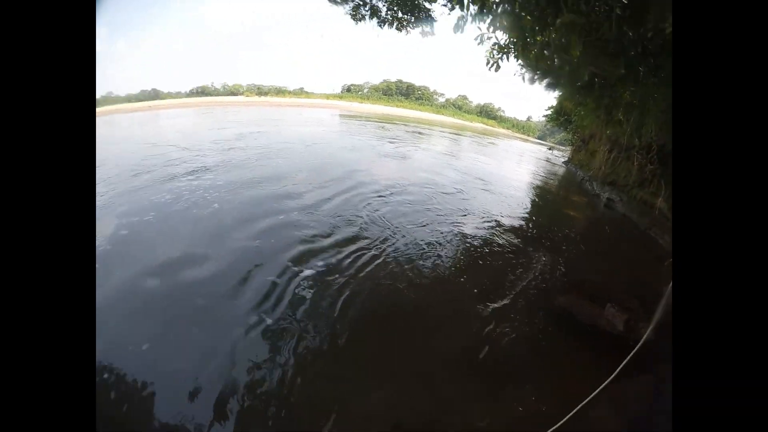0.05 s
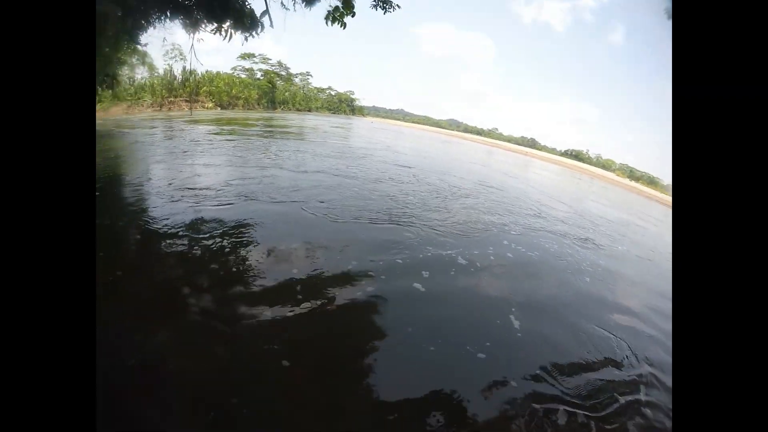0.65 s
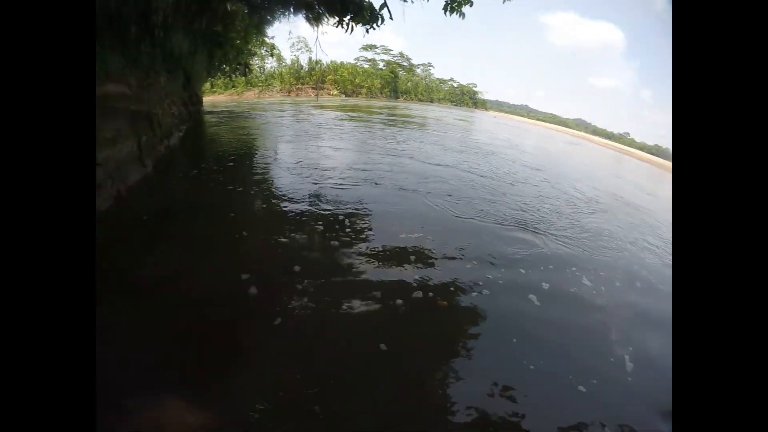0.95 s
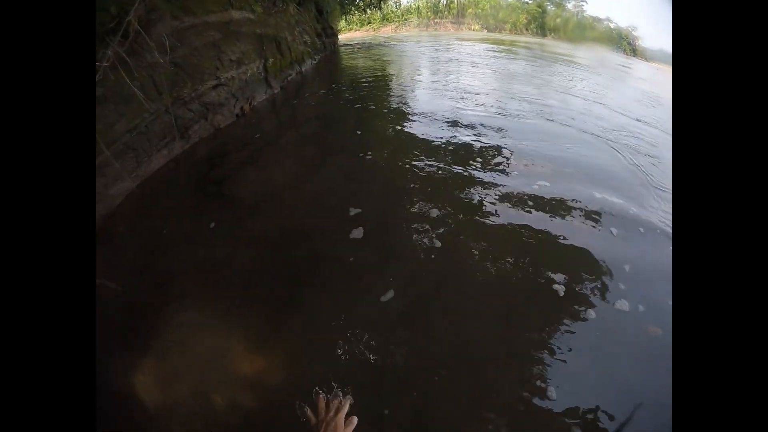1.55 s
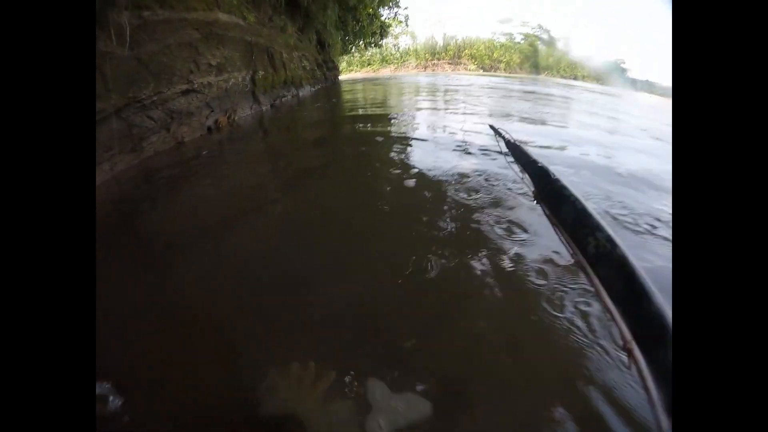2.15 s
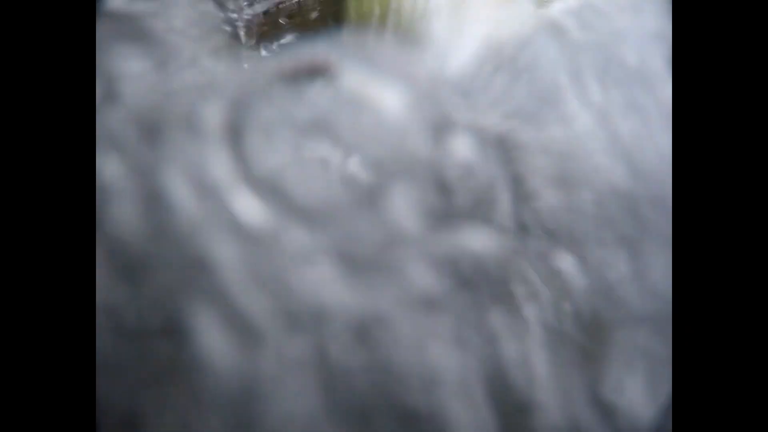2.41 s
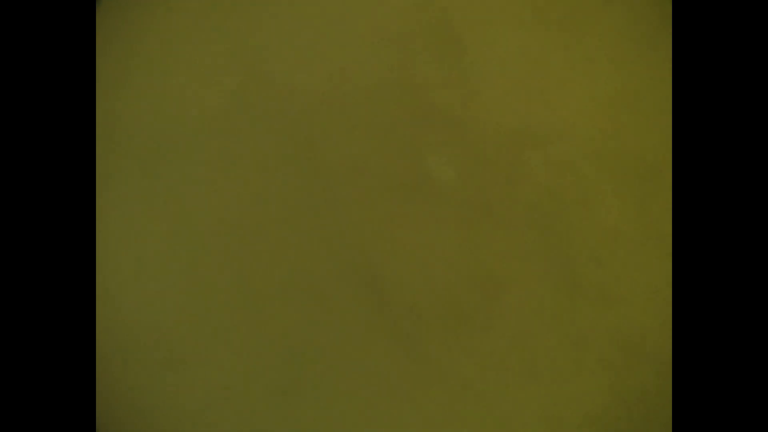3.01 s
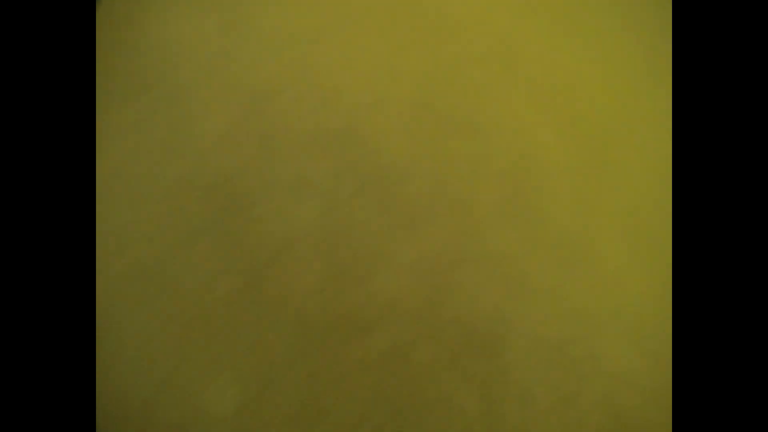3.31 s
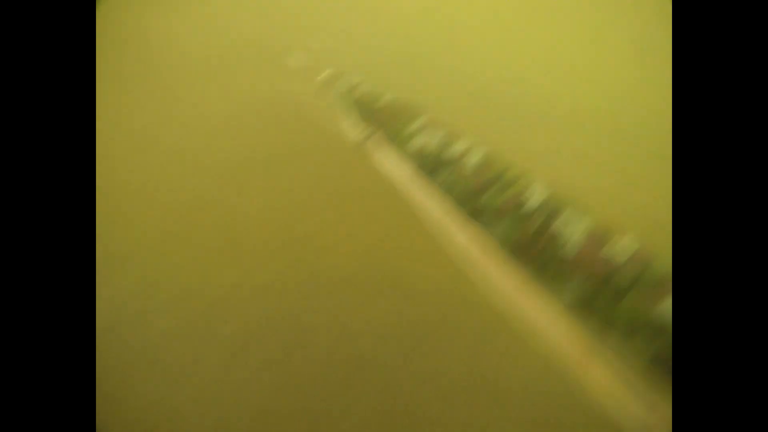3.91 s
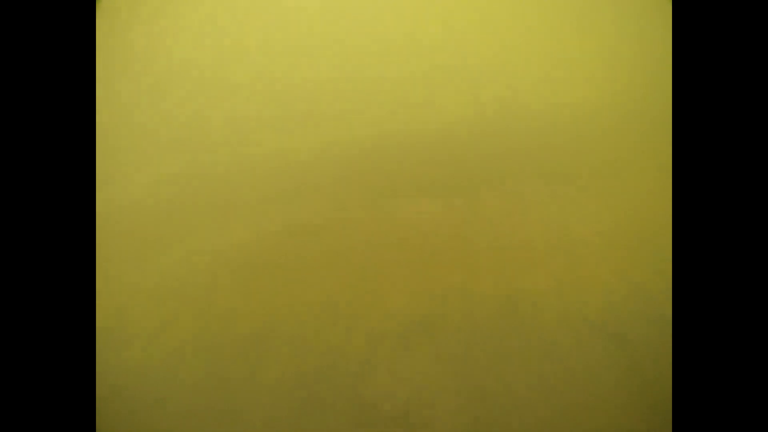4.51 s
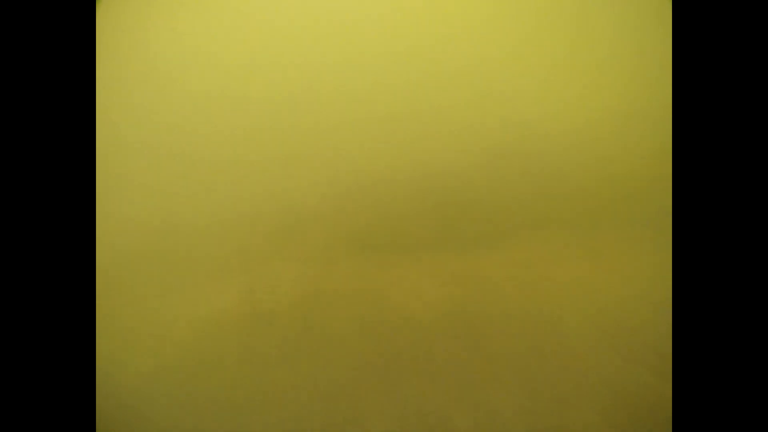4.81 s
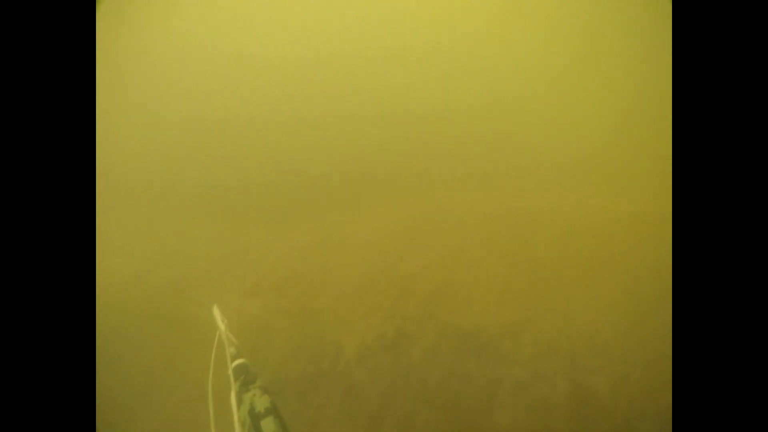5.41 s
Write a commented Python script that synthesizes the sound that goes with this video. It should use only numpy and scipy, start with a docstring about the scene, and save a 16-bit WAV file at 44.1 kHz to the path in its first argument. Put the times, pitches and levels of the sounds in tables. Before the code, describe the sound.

Quiet lapping and low gulps of river water build, close to the microphone, into slaps, spray and a splash with a deep rumble. The sound suddenly turns muffled as the microphone goes under the surface. Dense, hollow bubbling takes over, glug after glug above a dull churn and faint fizz. The last glugs get higher and thinner and shed tiny tinkling bubbles.

```python
"""First come soft, round gulps of water, as someone wades into a slow river with a waterproof camera.
The water sloshes and knocks on the case, spray hisses up, and a splash closes over the two microphone
openings, called ports. After a short hush comes the main sound, muffled under water: air tears loose
in a chain of glugs, each a group of ringing bubbles. Clouds of finer bubbles churn and fizz around
them, and the last glugs lose their deep note and shed tiny beads of air."""
import sys
import numpy as np
from scipy import signal
from scipy.fft import rfft, irfft, next_fast_len
from scipy.io import wavfile

SR = 44100
rng = np.random.default_rng(int(sys.argv[2]) if len(sys.argv) > 2 else 0)


def put_to_file(sound):
    """Save the sound as 16-bit audio at rate SR, in the file named by the first command-line argument."""
    columns = np.atleast_2d(sound).T  # one column per channel
    safe = np.clip(columns, -1, 1)
    whole_steps = np.round(safe * 32767)
    wavfile.write(sys.argv[1], SR, whole_steps.astype(np.int16))


N = 244755
TIME = np.arange(N) / SR
WADE_S, PLUNGE_S = 0.84, 2.324   # the camera starts to move; it hits the surface
SEALED_S, OPEN_S = 2.555, 2.62   # water seals the ports; the sound below is fully through
HUSH_DB = -57


# Big bubbles breaking off. Each row: start in seconds, pop level and main bubble level in dB, main and
# twin pitch in Hz, splinter level in dB, its pitch in Hz, seconds for these three to fade by 60 dB.
GLUGS = [(2.656, -6, -12.5, 578, 690, -4.5, 681, 0.043), (2.7054, -13, -22, 596, 340, -19.5, 931, 0.1),
         (2.727, -2, -14.5, 356, 539, -3.5, 621, 0.049), (2.7515, -8.0, -10.5, 595, 688, -16.5, 582, 0.08),
         (2.9203, -17, -18.0, 579, 330, -20.5, 828, 0.068), (2.94, -9.5, -16, 563, 824, -21.5, 750, 0.08),
         (2.9689, -7.5, -18, 810, 420, -33.5, 560, 0.1), (3.0201, -10, -17, 588, 632, -24, 601, 0.08),
         (3.1839, -10, -6, 447.5, 428, -3, 669, 0.059), (3.2279, -3.0, -7, 490, 378, -18.5, 708, 0.094),
         (3.2796, -3.5, -9, 486, 383, -20.5, 700, 0.087), (3.3695, 1, -9.5, 379.3, 573, -18.5, 513, 0.242),
         (3.4242, -2.0, -4, 296.7, 298.2, -13, 481, 0.15), (3.4692, -7, -28, 512, 500, -9.5, 508, 0.14),
         (3.5249, -5.5, -15, 547, 318.3, -35, 664, 0.16), (3.6193, -7, -14, 522.5, 275.7, -29, 726, 0.33),
         (3.6772, -7, -2.5, 450, 448, -28, 547, 0.21), (3.7586, -6, -6.5, 438.6, 445.6, -17.5, 550, 0.16),
         (3.8165, -13, -19, 437, 563, -28, 576, 0.25), (3.8803, -11.5, -14, 420, 420.6, -16, 516, 0.17),
         (3.9297, -16.5, -25, 570, 433, -38.5, 506, 0.259),
         (3.9771, -3.5, -10.0, 488.7, 386, -20, 571, 0.28),
         (4.034, -2.5, -7.5, 477.5, 486.5, -32, 565, 0.18),
         (4.0869, -4, -8.0, 444.6, 455, -21.5, 544, 0.205),
         (4.1403, -3.5, -13, 431.4, 445, -18.5, 556, 0.32), (4.1871, -6.5, -17, 472, 436, -22.5, 567, 0.31),
         (4.2319, -14.5, -14, 393.4, 365.6, -23, 641, 0.31), (4.2725, -4.5, -14, 458, 583, -16, 610, 0.25),
         (4.3212, -3.0, -6.5, 523.2, 525.5, -31, 674, 0.16),
         (4.3897, -2, -12.5, 460, 470, -13.5, 506, 0.32),
         (4.452, -3.5, -10.5, 431.7, 468.6, -24.5, 541, 0.37),
         (4.5102, -4, -14.0, 409.3, 424.3, -26, 559, 0.4),
         (4.5659, -1.5, -14, 424.4, 401.7, -15.5, 593.5, 0.32),
         (4.621, -2, -7.5, 448, 430, -13, 586, 0.163), (4.671, -2.5, -15.5, 477.5, 458, -14, 564, 0.28),
         (4.7178, -2.5, -15, 446, 564.5, -26, 714, 0.31), (4.7636, -8.5, -6.5, 505, 274.6, -24, 658, 0.091),
         (4.819, -4, -6, 459, 471.4, -29.5, 643, 0.14), (4.8613, -2, -6.5, 450, 456, -13, 708, 0.133),
         (4.9035, -4, -13.5, 448.4, 607.5, -15, 621, 0.34), (4.945, -4, -7, 451, 741, -14, 910, 0.094),
         (4.9871, -8, -11, 448, 613, -8, 964, 0.058), (5.0199, -5, -6.5, 303, 863, -8, 495, 0.044),
         (5.0514, -4.5, -13, 747, 808, -20.5, 607, 0.12), (5.0787, -7.0, -6.5, 759, 342, -23, 560, 0.065),
         (5.1121, -8.5, -14, 706, 361, -25.5, 567, 0.119), (5.1362, -13, -8.5, 382, 720, -14.5, 938, 0.077),
         (5.1496, -2.5, -12.5, 709, 451, -23, 545, 0.14), (5.1823, -3, -12, 772, 414, -27, 944, 0.12),
         (5.2278, -6.5, -8.5, 401, 683, -8.5, 974, 0.062), (5.2712, -6, -5.5, 828, 426, -13.5, 668, 0.051),
         (5.2991, -6, -8, 573, 397, -13, 774, 0.1), (5.3515, -4, -4.5, 569, 762, -5.5, 808, 0.047),
         (5.3952, -9.0, -13.5, 764, 820, -24.5, 947, 0.071)]
# The escaping air rings higher as it shrinks. Each row: time in seconds, pocket and pop pitch in Hz.
GLUG_PITCHES = [(2.65, 101.7, 404), (3.15, 72.8, 440), (3.4, 81.5, 340), (4.0, 86.9, 380), (4.6, 98.8, 349),
                (4.72, 131.7, 350), (4.88, 152.4, 423), (5.03, 176.3, 507), (5.4, 140, 601)]

def glugs(sag_per_s=0.27, drained_s=4.803, drain_db_per_s=44, choke_s=0.15, muffle_hz=1080):
    """Air pops loose and rings as a deep pocket, two bubbles that waver together, and a small splinter."""
    out = np.zeros(N)
    next_starts = [row[0] for row in GLUGS[1:]] + [N / SR]
    times, *pitches = np.transpose(GLUG_PITCHES)
    for (s, pop_db, db, hz, twin_hz, splinter_db, splinter_hz, t60), next_s in zip(GLUGS, next_starts):
        pocket_hz, pop_hz = (np.interp(s, times, column) for column in pitches)
        pocket_db = pop_db - 1.63 - drain_db_per_s * max(s - drained_s, 0)   # its air runs out
        sound = bubble(pop_hz, pop_db, 0.022, onset=0.39, snap=1.39, settle=0.43)
        sound += bubble(pocket_hz, pocket_db, 0.11, onset=0.35, snap=1.63, settle=0.33, rise=0.3)
        sound += bubble(hz, db, t60, onset=0.91, snap=0.48, settle=0.61, rise=-sag_per_s)
        sound += bubble(twin_hz, db - 4.5, t60, onset=1, rise=-sag_per_s)
        sound += bubble(splinter_hz, splinter_db, t60, onset=1.6, snap=0.22, settle=0.64, rise=-sag_per_s)
        # the next glug carries this one off
        late_s = np.maximum(s + np.arange(len(sound)) / SR - next_s, 0)
        add(out, s, sound * np.exp(-(late_s / choke_s) ** 2))
    return ports(filtered(out, 10, muffle_hz, "low"))


def beads(from_s=4.97, count=16, low_hz=1280, high_hz=2150, cycles=14):
    """Each of the last glugs sheds tiny beads of air that ring briefly, most of them at once."""
    out = np.zeros(N)
    starts = np.repeat([s for s, *_ in GLUGS if s > from_s], count)
    for s, (lag, pitch, faintness) in zip(starts, rng.random((len(starts), 3))):
        hz = low_hz * (high_hz / low_hz) ** pitch
        bead = bubble(hz, -26 - 13.5 * faintness, cycles / hz, onset=1)
        add(out, s + 0.028 * lag ** 2, bead * low_hz / hz)
    return ports(out)


# Knocks and slaps on the case, and short plops of air under water. Each row: time in seconds, relative
# thud level in dB, thud pitch in Hz, relative crack level in dB, the crack's top frequency in Hz,
# seconds for it to fade by 60 dB.
KNOCKS_AND_PLOPS = [(1.0961, -8, 146, -10, 1700, 0.0073), (1.289, -12, 550, -15.5, 2420, 0.01),
                    (1.6, -56, 705, -24, 9500, 0.0059), (2.099, -17.5, 1050, -17, 2300, .03),
                    (2.258, -4, 552, -18, 4000, 0.017), (2.306, -2.5, 730, -8, 7700, 0.024),
                    (2.333, -3, 130, -10, 4000, 0.03), (2.343, -9, 920, -16, 1500, 0.027),
                    (2.378, -7, 1050, -8.5, 3900, 0.02), (2.422, -30, 800, -4, 4500, 0.015),
                    (2.437, -35, 420, -7, 7500, 0.027), (2.457, -9.5, 500, -8, 7260, 0.05),
                    (2.469, -27, 503, -6, 6500, 0.03), (2.504, -35, 686, -22, 8900, 0.012),
                    (2.55, -21.5, 526, -21, 9700, .012), (2.658, -17, 473, -23, 2920, 0.027),
                    (2.726, 1.5, 173, -38, 1500, .02), (3.25, -7, 850, -8, 4800, 0.056),
                    (3.263, -2, 880, -5.5, 3340, 0.027), (3.3397, -5, 900, -10, 2540, .035),
                    (5.354, -6.5, 126, -35, 2000, 0.014)]
# The notes the case rings at. Each row: pitch in Hz, width in Hz, relative level in dB.
CASE_NOTES = [(1996, 170, 7.5), (3180, 230, 0.5), (3970, 190, -5), (5300, 160, -5), (6190, 170, 3),
              (9600, 800, -2)]

def knocks_and_plops():
    """Each knock, slap or plop of air is a dull thud with a gritty crack that rings the case."""
    thuds, cracks = np.zeros((2, N))
    t = np.arange(SR // 10) / SR
    for s, thud_db, hz, crack_db, top_hz, t60 in KNOCKS_AND_PLOPS:
        add(thuds, s, bubble(hz, thud_db + 5, 0.024, onset=0.34, snap=0.17))
        grit = rng.standard_normal(len(t)) * from_db(25 * np.tanh(rng.standard_normal(len(t))))
        grit = rms_one(filtered(grit, 3, [500, top_hz], "band"))
        build_s = 0.062 * t60
        since_peak = t - 4 * build_s
        envelope = np.minimum(np.exp(since_peak / build_s), from_db(-60 * since_peak / t60))
        add(cracks, s + since_peak[0], grit * from_db(crack_db - 10) * envelope)
    return ports(thuds + ringing(cracks, CASE_NOTES, ring_db=-6.5))


# Drips and small bubbles close by. Each row: start in seconds, relative level in dB, pitch in Hz.
PINGS = [(1.6, -24.5, 6250), (1.69, -36.5, 1800), (1.74, -30, 6200), (2.322, -16, 1944),
         (2.333, -15.5, 1880), (2.336, -15, 3530), (2.348, -14, 1970), (2.358, -18, 3700),
         (2.363, -10, 1344), (2.375, -12, 1860), (2.399, -17, 1920), (2.421, -17, 2030), (2.436, -13, 2260),
         (2.452, -14, 5960), (2.465, -13.5, 4800), (2.468, -9.5, 2200), (2.474, -7.5, 2120),
         (2.511, -17, 2130), (2.548, -20, 3460), (3.083, -25, 1780), (3.251, -19, 4180),
         (3.337, -11.5, 2504), (3.604, -29.5, 1960), (4.239, -26.5, 2016), (5.118, -23.5, 1580),
         (5.08, -26, 1520), (5.3122, -16.5, 1520), (5.3637, -24, 2030)]

def pings(cycles=55):
    """Small, lone bubbles ring with a slightly rising pitch."""
    out = np.zeros(N)
    for s, db, hz in PINGS:
        add(out, s, bubble(hz, db + 5.5, cycles / hz, onset=1.3, rise=0.6))
    return ports(out)


# Slow gulps of water. Each row: start in seconds, relative level in dB, pitch in Hz.
GULPS = [(0.112, -35, 427), (0.115, -32.5, 199), (.19, -32, 185), (0.234, -32.5, 154), (0.665, -24.5, 156),
         (.903, -29, 417), (0.906, -23.5, 188), (1.29, -26.5, 153), (1.404, -23, 144), (1.492, -23.5, 146),
         (1.862, -24.5, 170), (2.119, -25, 478), (2.726, -9.5, 123.4)]

def gulps(cycles=17.5):
    """Big, lone bubbles ring low and round with a falling pitch."""
    out = np.zeros(N)
    for s, db, hz in GULPS:
        add(out, s, bubble(hz, db + 8, cycles / hz, onset=1.5, snap=0.72, rise=-0.32))
    return ports(out)


# How hard water rushes up round the ports. Each row: time in seconds, relative level in dB.
RUSH = [(1.55, -58), (1.72, -50), (1.98, -48.5), (2.11, -37), (2.17, -38.5), (2.297, -32), (2.325, -30.5),
        (2.46, -28), (2.55, -31)]
# The tone of the splash. Each row: frequency in Hz, relative level in dB.
SPLASH_TONE = [(120, -49), (260, 1.5), (500, 9.5), (900, 4.5), (1400, -2), (2000, -4.5), (4000, -70)]

def splash(drown_db_per_s=51):
    """Water climbs the case and bursts at the plunge; the splash sinks away before its spray does."""
    rush = from_db(over_time(RUSH) + 1.5 - drown_db_per_s * np.maximum(TIME - PLUNGE_S, 0))
    burst = swell(PLUNGE_S, db=-19.5, rise_s=0.015, fall_s=0.089)
    return np.hypot(rush, burst) * noise(SPLASH_TONE, flicker_db=3, pops_per_s=120, pop_db=4, spread_db=2)


# The tone of the spray. Each row: frequency in Hz, relative level in dB.
SPRAY_TONE = [(900, -14), (1400, 0.5), (1600, -26), (2000, -2), (2700, -4.5), (3400, -6.5), (4400, -6.5),
              (6200, -12), (7200, -10.5), (9800, -23), (11500, -36), (15000, -52)]

def spray():
    """Spray hisses and rings the case as far as the rush of water rises over the steady hush."""
    gain = np.sqrt(np.maximum(from_db(over_time(RUSH)) ** 2 - from_db(HUSH_DB) ** 2, 0))
    mist = noise(SPRAY_TONE, flicker_db=3, pops_per_s=260, pop_db=-5, spread_db=3)
    return from_db(-1) * gain * ringing(mist, CASE_NOTES, ring_db=1)


def trapped_bubbles(per_s=260, cycles=18, low_hz=550, high_hz=7000, step_s=0.001):
    """The splash traps bubbles of all sizes; their loudness follows the rush of water."""
    out = np.zeros(N)
    times, rush_db = np.transpose(RUSH)
    slots = np.arange(times[0], times[-1], step_s)
    for s, (chance, pitch, faintness) in zip(slots, rng.random((len(slots), 3))):
        if chance < per_s * step_s:
            hz = low_hz * (high_hz / low_hz) ** pitch
            db = np.interp(s, times, rush_db) + 0.5 - 9 * np.log(faintness + 0.098)
            add(out, s, bubble(hz, db, cycles / hz, onset=0.99, rise=2.5))
    return ports(out)


def spatter(per_s=110, t60=0.015):
    """Flung drops smack the case and ring it, as hard as the water rushes."""
    hits = (rng.random(N) < per_s / SR) * from_db(2 * np.minimum(rng.exponential(1, N), 3))
    envelope = signal.lfilter([1], [1, -from_db(-60 / (t60 * SR))], hits + 1e-18)
    grit = filtered(envelope * rng.standard_normal(N), 4, [800, 6500], "band")
    gain = from_db(over_time(RUSH) - 2.5) * (TIME > RUSH[0][0])
    return ports(gain * rms_one(ringing(grit, CASE_NOTES, ring_db=2)))


# Passing clouds of fine bubbles. Each row: peak time in seconds, churn level in dB, fizz level in dB,
# rise and fall in seconds.
CLOUDS = [(2.72, -26.5, -50.5, 0.28, 0.1), (2.82, -53, -49.5, 0.19, 0.6), (3.213, -24.5, -44, 0.23, 0.31),
          (3.62, -21.5, -48.5, 0.08, 0.11), (4.255, -32, -49, 0.044, 0.079), (4.92, -28, -44.5, 0.22, 0.45)]
# The tones of their churn, fizz and hiss. Each row: frequency in Hz, relative level in dB.
CHURN_TONE = [(40, -4), (70, 7.5), (140, 6), (220, -3.5), (400, 2.5), (650, -7.5), (850, -36.5),
              (1200, -46), (2500, -71.5)]
FIZZ_TONE = [(700, -0.5), (1000, 0.5), (1500, 1), (2050, -0.5), (2700, -10.5), (3400, -11), (4400, -34)]
HISS_TONE = [(2200, -31), (3200, -3), (4200, -7), (5500, -3), (6400, -4), (7300, -3.5), (10000, -6),
             (12000, -26), (15000, -38.5)]
# The notes a slit in the case sings. Each row: pitch in Hz, width in Hz, relative level in dB.
SLIT_NOTES = [(3100, 240, -2.5), (6320, 370, 4)]
# Stereo width under water. Each row: frequency in Hz, level of the sides over the middle in dB.
WIDTH_UNDER = [(40, -8.5), (400, -3.5), (600, 2), (850, 20.5), (1500, -2), (2200, -2.5), (7000, 0),
               (15000, 0.5)]

def bubble_clouds(fade_db_per_s=2):
    """Under water, clouds of bubbles churn dully; their fizz and hiss come faintly through the case."""
    churn_swells = np.linalg.norm([swell(s, db, rise, fall) for s, db, _, rise, fall in CLOUDS], axis=0)
    fizz_swells = np.linalg.norm([swell(s, db, rise, fall) for s, _, db, rise, fall in CLOUDS], axis=0)
    churn = noise(CHURN_TONE, WIDTH_UNDER, flicker_db=3.5, pops_per_s=35, pop_db=6.5, spread_db=2)
    churn *= np.hypot(from_db(-30 - fade_db_per_s * (TIME - OPEN_S)), churn_swells)
    fizz = noise(FIZZ_TONE, WIDTH_UNDER, flicker_db=4, pops_per_s=58, pop_db=-7, spread_db=-2)
    fizz *= np.hypot(from_db(-54.5), fizz_swells)
    # the steady hiss barely touches the slit; a passing cloud sings in it
    steady = ringing(noise(HISS_TONE, WIDTH_UNDER, flicker_db=2.5), SLIT_NOTES, ring_db=-19)
    singing = ringing(noise(HISS_TONE, WIDTH_UNDER, flicker_db=3.5), SLIT_NOTES, ring_db=5.5)
    hiss = from_db(-64) * steady + from_db(-9) * fizz_swells * singing
    return churn + ringing(fizz, CASE_NOTES, ring_db=-8.5) + hiss


# The tone of the rumble. Each row: frequency in Hz, relative level in dB.
RUMBLE_TONE = [(15, 1.5), (25, -4.5), (45, -14), (70, -18.5), (120, -27.5), (250, -71.5)]

def rumble(grow_db_per_s=12.5, fade_db_per_s=9):
    """Motion pushes air and water on the ports: it grows, heaves just before the plunge, then fades."""
    moving_db = -39.5 + grow_db_per_s * (np.minimum(TIME, PLUNGE_S) - WADE_S)
    moving_db -= fade_db_per_s * np.maximum(TIME - PLUNGE_S, 0)
    moving = from_db(moving_db) * np.clip((TIME - WADE_S) / 0.024, 0, 1)
    heave = swell(PLUNGE_S - 0.051, db=-8.5, rise_s=0.059, fall_s=0.31)
    return np.hypot(from_db(-62) + moving, heave) * noise(RUMBLE_TONE, flicker_db=4)


# The tone of the slosh. Each row: frequency in Hz, relative level in dB.
SLOSH_TONE = [(60, -50), (100, -7), (150, 6), (190, -8), (250, -8.5), (400, -19), (800, -81)]

def slosh(grow_db_per_s=4):
    """Water laps louder as the wader goes deeper; only the plunge stirs its lowest notes."""
    water = noise(SLOSH_TONE, flicker_db=2.5)
    lapping = from_db(-49 + grow_db_per_s * TIME) * filtered(water, 6, 139, "high")
    return lapping + swell(PLUNGE_S, db=-15.5, rise_s=0.089, fall_s=0.46) * water


# Faint, far-off whistles. Each row: start and length in seconds, relative level in dB, first and
# last pitch in Hz.
WHISTLES = [(0.408, 0.11, -47.5, 760, 678), (0.613, .04, -45, 1190, 1000)]

def whistles():
    """Each pure, birdlike note comes in quickly, slides down and fades."""
    out = np.zeros(N)
    for s, length, db, first_hz, last_hz in WHISTLES:
        progress = np.linspace(0, 1, int(length * SR))
        pitch = last_hz + (first_hz - last_hz) * (1 - progress) ** 4
        envelope = from_db(db) * np.sin(np.pi * np.sqrt(progress)) * np.exp(-progress)
        add(out, s, envelope * np.sin(2 * np.pi * np.cumsum(pitch) / SR))
    return out


# The tone of the open air. Each row: frequency in Hz, relative level in dB.
HUSH_TONE = [(500, -7), (700, 3), (1000, 7), (1500, 2.5), (2500, 2), (4000, -2.5), (9500, -2.5),
             (12000, -12.5), (14000, -21), (15500, -40)]

def hush():
    """The steady hush over the river lightly rings the case."""
    return from_db(HUSH_DB) * ringing(noise(HUSH_TONE, flicker_db=2), CASE_NOTES, ring_db=-6)


# How hollows in front of the left port change its sound. Each row: frequency in Hz, then level in dB
# and phase in radians, both against the right port.
LEFT_PORT = [(79.6, -5.5, 0), (300, -5.5, -0.8), (470, -6.5, -0.6), (547, -13, -1.24), (677, -4.5, -3),
             (800, -1.5, -2.5), (930, 2.5, -4), (1340, -6.5, -3.5), (1940, -3.5, -4.5), (2400, -1.5, -4.5),
             (4000, -8, -5), (8000, -2.5, -4.5)]

def ports(x):
    """The right port hears the water directly; the left one hears it late and with less bass."""
    size = next_fast_len(N + SR // 10)
    bin_hz = np.arange(size // 2 + 1) * SR / size + 1
    hz, *columns = np.transpose(LEFT_PORT)
    db, phase = (np.interp(np.log(bin_hz), np.log(hz), column) for column in columns)
    left = irfft(rfft(x, size) * from_db(db) * np.exp(1j * phase), size)[:N]
    return np.array([left, x])


# The usual stereo width. Each row: frequency in Hz, level of the sides over the middle in dB.
WIDTH = [(40, -13), (150, -3.5), (300, 1.5), (640, 6), (1400, 7), (3000, -4), (7000, 2), (15000, -4)]
# How noise leans to one side. Each row: frequency in Hz, level of left over right in dB.
LEAN = [(60, 0.5), (300, -5), (700, -4), (1300, 1.5), (2400, 1), (4400, -4), (8000, -4), (15000, 7)]

def noise(tone, width=WIDTH, flicker_db=0, pops_per_s=0, pop_db=0, spread_db=0):
    """Stereo noise in narrow bands that each flicker; bubbles can pop in each band too."""
    mids, sides = 0, 0
    edges = 14 * 2 ** np.arange(0, 10.4, 1 / 3)   # three bands to an octave
    white = rng.standard_normal((2, 2, N))
    for k, (low, high) in enumerate(zip(edges, edges[1:])):
        hz = np.sqrt(low * high)
        if not tone[0][0] <= hz <= tone[-1][0]:
            continue
        drive = white[k % 2].copy()
        if pops_per_s:
            starts = np.flatnonzero(rng.random(N) < pops_per_s / SR)
            strengths = from_db(spread_db * np.minimum(rng.exponential(1, len(starts)), 4))
            pops = np.zeros((2, N))
            pops[:, starts] = strengths * rng.standard_normal((2, len(starts)))
            drive += from_db(pop_db) * rms_one(pops)
        band = filtered(drive, 2, [low, high], "band")
        mid, side = band * from_db(at_hz(tone, hz) + flicker_db * flicker())
        side *= from_db(at_hz(width, hz))
        lean = np.tanh(at_hz(LEAN, hz) * np.log(10) / 40)
        mids += mid + lean * side
        sides += side + lean * mid
    return np.array([mids + sides, mids - sides]) / np.std(mids)


def bubble(hz, db, t60, onset, snap=0, settle=0.47, rise=0):
    """Trapped air rings: it swells over `onset` cycles and fades by 60 dB in `t60` seconds."""
    t = np.arange(int(0.35 * SR)) / SR
    # the pitch drops over `settle` cycles as the bubble's neck snaps, then creeps by `rise`
    pitch = hz * (1 + snap * np.exp(-t * hz / settle) + rise * t)
    envelope = from_db(db - 60 * t / t60) * (1 - np.exp(-(t * hz / onset) ** 2))
    return envelope * np.sin(2 * np.pi * np.cumsum(pitch) / SR)


def ringing(x, notes, ring_db):
    """A sound sets a table of notes ringing; its overall level stays the same."""
    ring = 0
    for hz, width_hz, db in notes:
        r = np.exp(-np.pi * width_hz / SR)
        feedback = [1, -2 * r * np.cos(2 * np.pi * hz / SR), r * r]
        note = (1 - r * r) / 2 * signal.lfilter([1, 0, -1], feedback, x + 1e-18)
        ring += from_db(db + ring_db) * note
    return rms_one(x + ring) * np.std(x)


def swell(s, db, rise_s, fall_s):
    """A gain that peaks at time s and is a tenth as high rise_s before and fall_s after."""
    t = TIME - s
    return from_db(db - 20 * np.maximum(-t / rise_s, t / fall_s))


def flicker(rate_hz=15.7, step=40):
    """A smooth random wobble with a typical size of 1."""
    r = np.exp(-2 * np.pi * rate_hz * step / SR)
    slow = signal.lfilter([1], [1, -2 * r, r * r], rng.standard_normal(N // step + 2002))[2000:]
    return np.interp(np.arange(N) / step, np.arange(len(slow)), rms_one(slow))


def filtered(x, order, hz, kind):
    """Keep the lows, the highs or a band; a higher order cuts more sharply."""
    return signal.sosfilt(signal.butter(order, hz, kind, fs=SR, output="sos"), x)


def from_db(db):
    """Turn decibels into a gain."""
    return 10 ** (np.asarray(db) / 20)


def rms_one(x):
    """Scale a sound to an average power of 1."""
    return x / np.sqrt(np.mean(x ** 2) + 1e-20)


def over_time(table):
    """Read a table of times and values at every sample."""
    return np.interp(TIME, *np.transpose(table))


def at_hz(table, hz):
    """Read a table at one frequency, with octaves evenly spaced."""
    frequencies, values = np.transpose(table)
    return np.interp(np.log(hz), np.log(frequencies), values)


def add(track, s, sound):
    """Mix a sound in from time s."""
    start = int(s * SR)
    track[start:start + len(sound)] += sound[:N - start]


def scene(fade_db_per_s=1100):
    """Air gives way to water, with a moment of hush between."""
    above = from_db(-fade_db_per_s * np.clip(TIME - SEALED_S, 0, 0.2))
    below = from_db(-fade_db_per_s * np.clip(OPEN_S - TIME, 0, 0.2))
    surface = slosh() + splash() + spray() + trapped_bubbles() + spatter() + whistles() + hush()
    river = above * surface + below * bubble_clouds() + np.maximum(above, below) * rumble()
    return river + glugs() + beads() + pings() + gulps() + knocks_and_plops()


def record(dry, cutoff_hz=15300):
    """Round off the loudest peaks and cut the highest treble."""
    rounded = dry / (1 + dry ** 6) ** (1 / 6)
    return signal.sosfilt(signal.ellip(10, 0.2, 80, cutoff_hz, fs=SR, output="sos"), rounded)


dry = scene()
out = record(dry)
put_to_file(out)
```